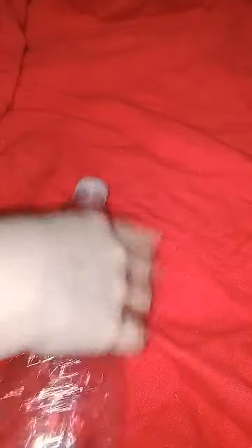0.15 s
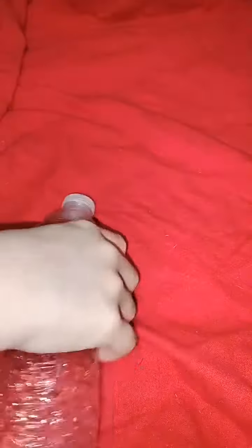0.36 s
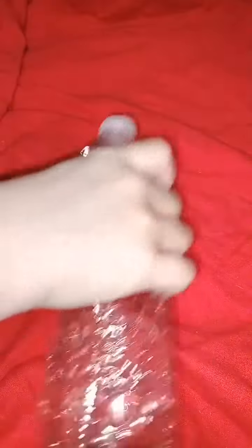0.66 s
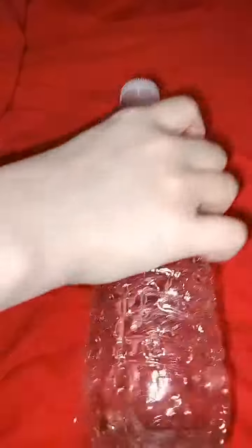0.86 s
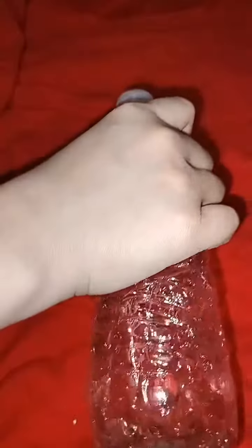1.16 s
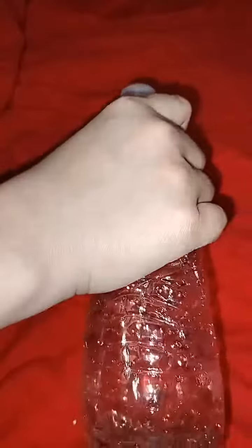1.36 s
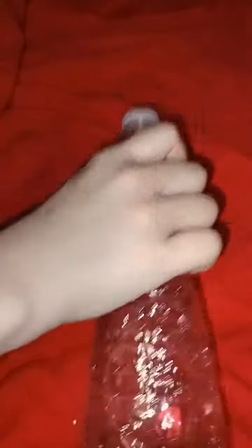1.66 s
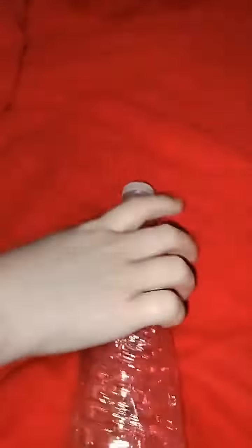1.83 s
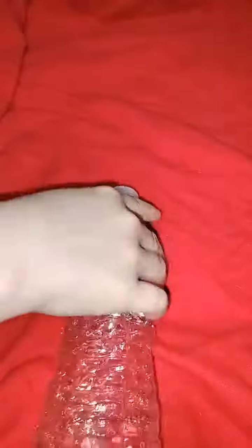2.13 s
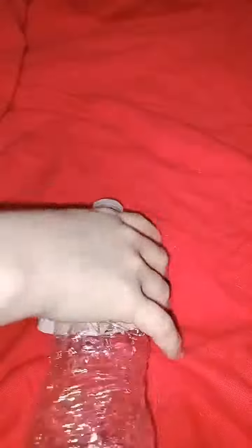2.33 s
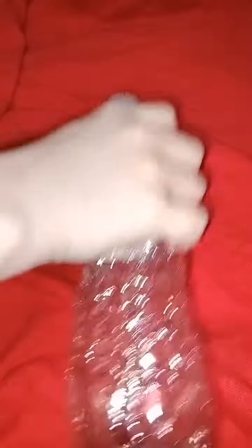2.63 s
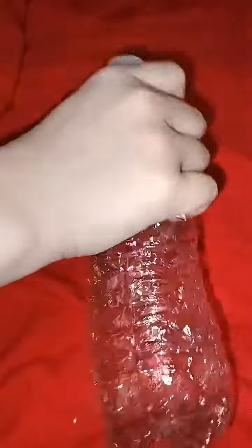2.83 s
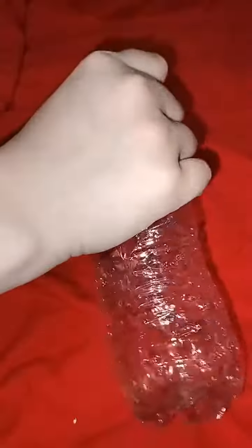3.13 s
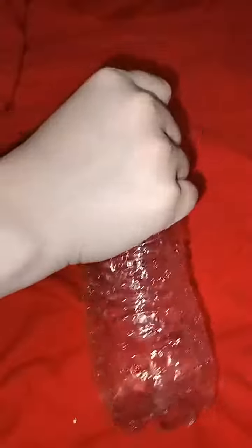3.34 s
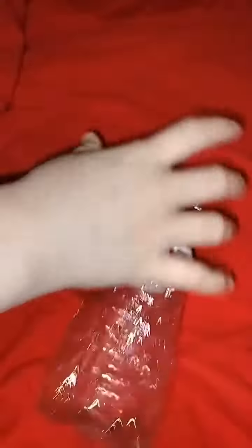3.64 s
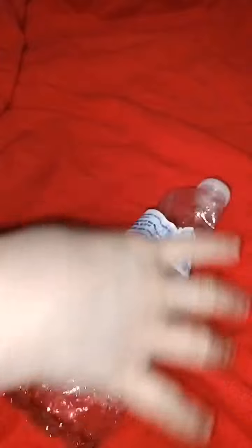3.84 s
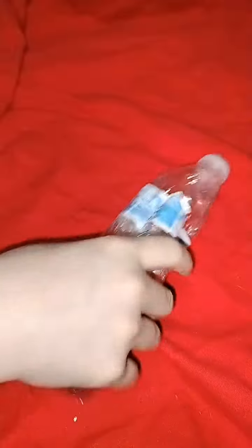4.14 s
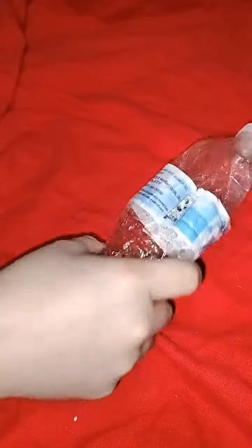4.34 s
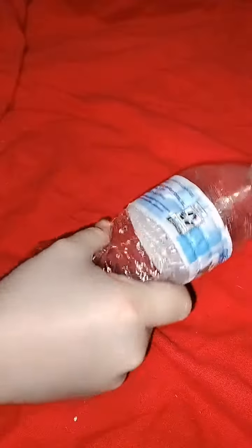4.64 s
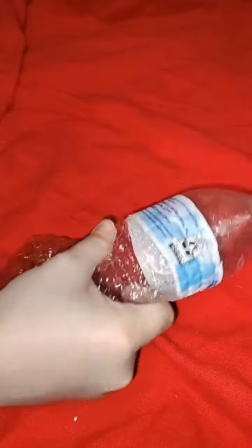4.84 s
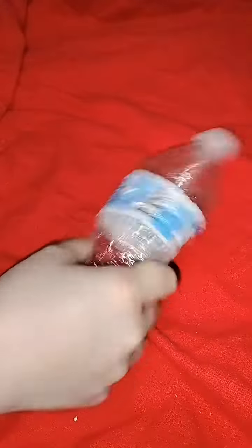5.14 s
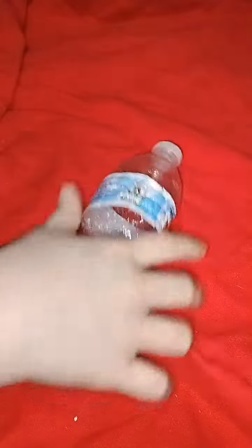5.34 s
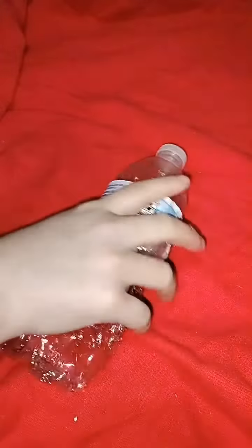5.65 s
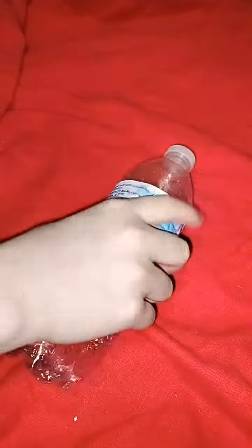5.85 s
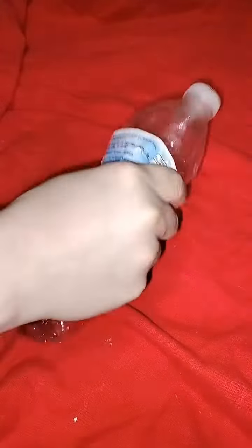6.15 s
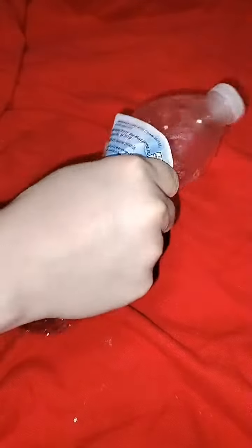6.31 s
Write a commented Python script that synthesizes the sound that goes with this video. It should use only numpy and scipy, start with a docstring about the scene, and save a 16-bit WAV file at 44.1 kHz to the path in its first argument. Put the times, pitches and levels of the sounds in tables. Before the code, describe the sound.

Crisp plastic bottle crushing: four crackling squeezes with bright snaps and dull dents, lighter clicks in the gaps, in a small quiet room.

```python
"""A hand crushes a thin plastic bottle on a cloth, close to a phone, in four squeezes with light touches between.
Each time the wall buckles, a panel pops over, its crease cracks and the film sizzles: damped tones and noise bursts.
Showers of tiny noise bursts are the small folds that follow the pressure; broad dents swing low and dull.
The hand bumps the bottle into the cloth with low pushes, and a small room answers with a tail of fading noise.
Steady noise lies underneath, and the loudest snaps overload the microphone."""
import sys
import numpy as np
from scipy import signal
from scipy.fft import rfft, irfft, next_fast_len
from scipy.io import wavfile
from scipy.ndimage import uniform_filter1d, map_coordinates

SR = 44100
rng = np.random.default_rng(int(sys.argv[2]) if len(sys.argv) > 2 else 0)


def file_out(sig):
    """Save sig as 16-bit WAV at sys.argv[1]."""
    # one column per channel
    cols = np.atleast_2d(sig).T
    # limit, then scale
    lim = np.clip(cols, -1, 1)
    pcm = np.round(lim * 32767).astype(np.int16)
    wavfile.write(sys.argv[1], SR, pcm)


N = 285757

# The quiet noise of the room. Each row: frequency in Hz, relative level in dB.
AIR_SPECTRUM = [(25, -18), (110, 2), (230, -15.5), (540, -1), (850, -9), (1600, -15.5), (7100, -20),
                (9500, -31.5), (16000, -25)]
# How alike left and right are. Each row: frequency in Hz, likeness from 0 (unrelated) to 1 (the same).
LEFT_RIGHT_LIKENESS = [(100, 0.73), (500, 0.84), (1000, 0.71), (2000, 0.049), (5000, 0.036), (14000, 0.042)]
# How long the room rings. Each row: frequency in Hz, time to fade by 60 dB in seconds.
ROOM_FADE_TIMES = [(200, 0.0362), (4000, 0.2), (14000, 0.22)]
# How strongly the room answers. Each row: frequency in Hz, level in dB.
ROOM_SPECTRUM = [(100, -15), (500, -1.5), (1500, -8), (4000, -7.5), (8000, -8.5), (14000, -5.5)]
# Soft bumps of hand and bottle. Each row: start in seconds, level in dB before a common lift.
BUMPS = [(1.007, -25.5), (1.06, -32.5), (1.342, -26.5), (1.385, -25), (3.003, -28.5), (3.181, -15),
         (4.444, -31.5), (4.574, -17), (4.627, -18), (4.917, -33.5), (6.352, -28)]
# Deep dents, where a broad piece of wall caves in. Each row: start in seconds, pitch in Hz, level in dB.
DENTS = [(0.423, 192, -27), (0.8167, 226, -9.5), (1.203, 206, -21), (1.642, 210, -19.5), (2.101, 410, -24),
         (2.859, 194, -16), (3.636, 400, -10.5), (4.272, 228, -18), (6.291, 200, -17)]
# The fingers shift or rest lightly on the bottle.
# Each row: start in seconds, end in seconds, rub or flutter level in dB, crinkle level in dB.
TOUCHES = [(0, 0.01, -45, -37), (0.257, 0.678, -42, -45.5), (1.597, 1.9, -47, -42.5),
           (2.12, 2.45, -50, -61), (3.372, 3.5, -68, -40.5), (3.574, 3.62, -32.5, -36.5),
           (3.995, 4.03, -53, -69), (4.137, 4.2, -69, -42.5), (4.894, 4.928, -35.5, -24),
           (5.0, 5.28, -43, -46.5)]
# The hand bears down. Each row: start in seconds, end in seconds, then panel flutter level in dB
# and crinkle level in dB, both before the build-up, drift and release set below.
SQUEEZES = [(0.779, 1.363, -25, -28.5), (2.716, 3.169, -24.5, -31.5), (4.245, 4.73, -15.5, -24),
            (5.93, 6.47, -23.5, -30.5)]
# Colour of the popping panels. Each row: frequency in Hz, relative level in dB.
PANEL_SPECTRUM = [(60, -21), (130, -8.5), (200, -3.5), (430, 0.5), (680, -0.5), (1000, -2), (1500, -6),
                  (2200, -7), (5000, -50.5)]
# Colour of the cracking creases. Each row: frequency in Hz, relative level in dB.
CREASE_SPECTRUM = [(500, -9), (1100, -6.5), (1600, 1), (3000, 0.5), (5000, -1.5), (7300, -3), (8500, -16),
                   (12000, -37.5)]
# Colour of the sizzling film. Each row: frequency in Hz, relative level in dB.
SIZZLE_SPECTRUM = [(4000, -29), (7000, 6.5), (8200, 0), (9500, -8), (11300, -1.5), (13500, -5.5),
                   (15500, -9), (17000, -6)]
# Colour laid over the fine crinkling creases. Each row: frequency in Hz, relative level in dB.
CRINKLE_SPECTRUM = [(600, -14), (1500, 0.5), (2300, 3), (3000, 1.5), (4200, 1.5), (7200, 0.5), (8800, -16),
                    (11300, -8), (15500, -5.5)]
# The loud or lone buckles of the wall. Each row: time in seconds, panel pitch in Hz, panel level in dB,
# crease pitch in Hz, crease level in dB, sizzle level in dB (the last two before a left-right tilt).
SNAPS = [ (0.1076, 1320, -29, 1600, -56, -61), (0.177, 594, -25.5, 3170, -13.5, -34),
         (0.4237, 530, -15.5, 2000, -19.5, -37), (0.4774, 960, -18.5, 7440, -12, -19.5),
         (0.4916, 1510, -17.5, 5970, -15.5, -38), (0.5957, 653, -19, 2500, -13.5, -19),
         (0.6276, 540, -25, 3900, -15.5, -33.5), (0.6624, 970, -24, 7060, -15.5, -24),
         (0.6771, 790, -21, 6600, -23.5, -24), (0.7492, 626, -20, 5120, -14.5, -29.5),
         (0.7578, 900, -18, 2950, -13, -21), (0.7755, 920, -34, 2320, -12.5, -33.5),
         (0.782, 750, -11, 2170, -27, -44), (0.8187, 363, -11.5, 2410, -12.5, -26),
         (0.8359, 1500, -15, 2350, -16, -24), (0.8926, 1310, -19, 2020, -9.5, -20),
         (0.9167, 500, -25, 2180, -19, -27), (0.9664, 572, -21.5, 2140, -11, -23.5),
         (1.0042, 945, -16, 7030, -10, -18.5), (1.0326, 537, -13, 2420, -15.5, -32.5),
         (1.0615, 566, -24, 7450, -13.5, -30), (1.1105, 1004, -15, 3620, -23.5, -25),
         (1.1547, 830, -15, 3160, -13.5, -23), (1.179, 744, -11, 7190, -13, -16),
         (1.2044, 850, -14, 3780, -32, -40), (1.2113, 870, -26, 3430, -13, -25.5),
         (1.272, 1110, -36, 5760, -13, -18), (1.3109, 1280, -20, 5060, -13.5, -19),
         (1.3503, 360, -28.5, 6400, -11.5, -17), (1.3868, 1240, -26, 7220, -14, -18),
         (1.433, 930, -45, 7100, -17.5, -15.5), (1.553, 1000, -38, 7000, -20, -24),
         (1.5737, 1200, -65, 6600, -15.5, -16.5), (1.643, 376, -19.5, 3640, -14, -31),
         (1.6846, 894, -25.5, 2980, -14.5, -18), (1.7156, 1170, -53, 6660, -18.5, -19.5),
         (1.7965, 824, -24, 3370, -17, -35), (1.8403, 1030, -18.5, 1460, -21, -21),
         (1.8909, 830, -12, 2470, -16.5, -27), (1.9136, 920, -14, 2130, -18.5, -49),
         (1.9595, 657, -26, 6800, -20, -21.5), (2.1125, 440, -29, 1600, -41.5, -54),
         (2.1753, 920, -29, 3650, -14, -20.5), (2.6026, 870, -23.5, 2520, -12, -27.5),
         (2.6698, 874, -15, 6640, -15, -22.5), (2.7304, 896, -17.5, 3660, -19, -23),
         (2.7495, 517, -14.5, 3210, -16, -17.5), (2.7618, 493, -17, 6300, -14.5, -18.5),
         (2.8174, 443, -28, 2250, -22, -24), (2.8395, 645, -14, 2020, -12.5, -17.5),
         (2.9023, 600, -12, 3080, -18, -48), (2.9158, 537, -9.5, 7500, -27, -26.5),
         (2.9392, 600, -11, 3270, -18, -55), (2.9562, 485, -13.5, 2190, -25, -46),
         (3.0066, 910, -24, 4100, -21, -18.5), (3.0195, 900, -15.5, 2190, -11.5, -27),
         (3.0313, 573, -14, 2250, -20.5, -39), (3.0507, 745, -18, 2330, -16.5, -31),
         (3.1128, 428, -23, 6900, -18, -17), (3.1246, 870, -20.5, 5000, -14, -24),
         (3.1565, 1400, -46, 3500, -14.5, -43), (3.1814, 530, -22, 4600, -15, -20),
         (3.2133, 910, -26.5, 5100, -15, -18), (3.2534, 1400, -31, 3580, -14, -19),
         (3.2918, 810, -33, 7000, -17, -29), (3.3272, 990, -36, 6540, -24, -25),
         (3.3603, 1000, -30.5, 4350, -8.5, -20.5), (3.407, 1210, -40, 4270, -17.5, -24.5),
         (3.524, 930, -31, 4030, -19, -33), (3.5932, 820, -24, 7340, -22.5, -36),
         (3.6382, 420, -31.5, 5600, -21.5, -18.5), (3.7676, 1060, -23, 6600, -18, -25.5),
         (4.1007, 620, -27.5, 6000, -12.5, -34), (4.1178, 930, -23.5, 3220, -13.5, -23.5),
         (4.2114, 613, -16.5, 1630, -34, -28.5), (4.2389, 467, -13.5, 1480, -11, -25),
         (4.2734, 644, -7, 1560, -18, -26), (4.299, 1080, -24.5, 3640, -14.5, -27),
         (4.3499, 405, -14.5, 1600, -43, -27), (4.4067, 980, -42, 4260, -19.5, -27),
         (4.455, 870, -17, 1780, -20, -17.5), (4.4642, 800, -20, 7100, -16, -17),
         (4.608, 930, -10, 1630, -13, -23), (4.7431, 790, -14.5, 2730, -27, -28),
         (4.7744, 1190, -19, 1970, -14.5, -21), (4.8372, 985, -30, 7200, -15.5, -22),
         (4.8828, 1140, -20.5, 3900, -15.5, -20), (4.922, 1120, -20.5, 2660, -15.5, -19),
         (4.979, 1000, -20.5, 3480, -18, -24.5), (5.0596, 300, -26.5, 1590, -47, -41.5),
         (5.0864, 684, -34, 3630, -34.5, -34.5), (5.1171, 980, -30.5, 2400, -33, -43),
         (5.1425, 950, -37.5, 2320, -27, -41), (5.159, 1160, -41, 7000, -38, -30),
         (5.2263, 580, -21.5, 2320, -25.5, -47), (5.2532, 1290, -28.5, 7460, -15.5, -18),
         (5.2575, 1330, -20, 2450, -20.5, -20), (5.2747, 1010, -16, 2030, -13.5, -29.5),
         (5.3014, 503, -20.5, 1590, -28, -45), (5.375, 1400, -16, 1790, -19, -43),
         (5.515, 553, -18.5, 1490, -16, -31.5), (5.6306, 580, -32, 5150, -42, -49),
         (5.6567, 604, -13, 1620, -46.5, -50), (5.7306, 900, -25, 1620, -40.5, -65),
         (5.81, 1230, -44, 1560, -40, -74), (5.8951, 715, -27, 3260, -25.5, -36),
         (5.913, 1030, -18, 3400, -17, -20.5), (5.922, 1040, -16.5, 3250, -13, -25),
         (5.9657, 990, -13.5, 7000, -19.5, -18), (5.9779, 654, -10.5, 2020, -12, -38),
         (6.0138, 670, -13.5, 1930, -14, -29), (6.0217, 910, -9, 1640, -19.5, -35),
         (6.0418, 580, -13, 1560, -40, -46), (6.0749, 635, -14, 6440, -22, -40),
         (6.0949, 1230, -17, 5070, -14.5, -18), (6.1237, 687, -25, 3800, -19.5, -27),
         (6.1807, 1170, -16, 7100, -10.5, -20), (6.2355, 382, -12.5, 3920, -19, -40.5),
         (6.2724, 1380, -13.5, 1640, -24, -42), (6.2898, 676, -9, 3630, -8, -15.5),
         (6.328, 930, -13.5, 3500, -14.5, -21), (6.368, 1210, -17, 5030, -13, -21),
         (6.3782, 725, -18.5, 3710, -9.5, -16), (6.3974, 910, -17.5, 6900, -11.5, -22),
         (6.4508, 1080, -13.5, 5840, -15.5, -32), (6.4717, 570, -11.5, 7120, -11, -25)]

TOP_HZ = 16250  # nothing is kept from here up
# pressure builds, holds and lets go; broad panels are used up as it goes on, while fine creases multiply
ATTACK_S, ATTACK_DB, RELEASE_DB_PER_S = 0.11, 13, 114
FLUTTER_SAG_DB_PER_S, CRINKLE_GROWTH_DB_PER_S = 11, 6
TOUCH_FADE_DB_PER_S = 278.5
# a small buckle: its middle pitches, its sizzle relative to its crease, and the loudest its crease can be
PANEL_HZ, CREASE_HZ = 816, 3930
SIZZLE_DB, SMALL_LIMIT_DB = -2.5, -16.5
# how far small buckles stand above flutter and crinkle, and how much their levels and pitches vary
SMALL_PANEL_DB, SMALL_CREASE_DB, SMALL_SCATTER_DB = 3, 4, 5
PANEL_SCATTER_OCTAVES, CREASE_SCATTER_OCTAVES = 0.4, 0.7


def amp(db):
    """Turn decibels into a gain."""
    return 10 ** (np.asarray(db) / 20)


def unit(x):
    """Scale to an average strength (rms) of 1."""
    return x / np.sqrt(np.mean(x ** 2) + 1e-20)


def along(points, hz):
    """Read a (Hz, value) table at any frequency, along a log frequency axis."""
    f, v = np.transpose(points)
    return np.interp(np.log(hz + 1), np.log(f + 1), v)


def colour(table):
    """Turn a (Hz, dB) table into a function that gives the gain at each frequency."""
    return lambda hz: amp(along(table, hz))


def hump(hz, centre, octaves, skirt_db):
    """Gain of a broad resonance that stands on a flat skirt."""
    distance = np.log2((hz + 1) / centre) / octaves
    return amp(skirt_db) + 1 / (1 + distance ** 2)


def shaped(x, gain):
    """Filter x by a gain for each frequency, without any sound ahead of its cause (minimum phase)."""
    size = 2 * next_fast_len(x.shape[-1])
    log_gain = np.log(np.maximum(gain(np.fft.rfftfreq(size, 1 / SR)), 1e-6))
    cepstrum = irfft(log_gain)
    # fold the second half onto the first, so that the filter only looks back
    cepstrum[..., 1:size // 2] *= 2
    cepstrum[..., size // 2 + 1:] = 0
    response = np.exp(rfft(cepstrum))
    return irfft(rfft(x, size) * response)[..., :x.shape[-1]]


def ports(pair):
    """Turn two unrelated signals into left and right: alike in the bass, apart in the treble."""
    size = next_fast_len(pair.shape[-1], True)
    likeness = along(LEFT_RIGHT_LIKENESS, np.fft.rfftfreq(size, 1 / SR))
    angle = np.arccos(np.clip(likeness, -1, 1)) / 2
    a, b = rfft(pair, size)
    mid, side = a * np.cos(angle), b * np.sin(angle)
    return irfft(np.array([mid + side, mid - side]), size)[..., :pair.shape[-1]]


def stereo_noise():
    """Steady noise for the whole scene, left and right."""
    return ports(rng.standard_normal((2, N)))


def ring(t, hz, cycles, lag, attack):
    """A damped tone that reaches left and right a little apart and dies over a set number of cycles."""
    delay = np.array([np.maximum(lag, 0), np.maximum(-lag, 0)])
    age = np.maximum(t - delay, 0)
    fade = np.exp(-age * hz / cycles) * (1 - np.exp(-age / attack))
    return np.sin(2 * np.pi * hz * age) * fade


def placed(times, sounds):
    """Add up (side, event, time) sounds at their moments."""
    start = np.round(times * SR).astype(int)
    index = np.maximum(start[:, None] + np.arange(sounds.shape[-1]), 0)
    return np.array([np.bincount(index.ravel(), side.ravel(), N)[:N] for side in sounds])


def air():
    """The quiet steady noise of the room: random noise given the room's colour."""
    return amp(-52.5) * unit(shaped(stereo_noise(), colour(AIR_SPECTRUM)))


def room(x):
    """The walls answer after a moment with fading noise and one stronger echo; treble outlasts bass."""
    hz, t, grains = signal.stft(rng.standard_normal((2, SR // 2)), SR, nperseg=256)
    fade = amp(-60 * t / along(ROOM_FADE_TIMES, hz)[:, None])
    tail = signal.istft(grains * fade, SR, nperseg=256)[1]
    age = np.arange(tail.shape[-1]) / SR
    echo = 0.53 * np.exp(-((age - 0.017) / 0.0022) ** 2)
    tail *= (1 - np.exp(-age / 0.00093)) * (1 + echo)
    tail = shaped(ports(tail / np.linalg.norm(tail[0])), colour(ROOM_SPECTRUM))
    return signal.fftconvolve(x, tail, axes=1)[:, :N]


def bumps():
    """A bump is one low push of air that sinks in pitch, dies fast and differs a little left and right."""
    s, db = np.transpose(BUMPS)
    t = np.arange(SR // 10) / SR
    sway = rng.standard_normal((len(BUMPS), 2, 1)).swapaxes(0, 1)
    hz = 62 * np.exp(0.54 * sway)
    push = -np.sin(2 * np.pi * hz * t / (1 + t / 0.18)) * np.exp(-t / 0.0065)
    return placed(s, amp(db + 10.5)[None, :, None] * push)


def dents():
    """A broad piece of wall swings briefly, low and dull, as a strongly damped tone."""
    s, hz, db = np.transpose(DENTS)[:, :, None]
    t = np.arange(SR // 20) / SR
    return placed(s.ravel(), amp(db) * ring(t, hz, cycles=1.2, lag=0 * s, attack=0.0011))


def touching(t):
    """Rub or flutter and crinkle gains of the light touches at times t: steady, fading in and out."""
    start, end, rub_db, crinkle_db = np.transpose(TOUCHES)[:, :, None]
    fade_db = TOUCH_FADE_DB_PER_S * np.abs(t - np.clip(t, start, end))
    return amp((rub_db - fade_db).max(0)), amp((crinkle_db - fade_db).max(0))


def squeezing(t):
    """Flutter and crinkle gains that the squeezes give at times t: pressure builds, holds and lets go."""
    start, end, flutter_db, crinkle_db = np.transpose(SQUEEZES)[:, :, None]
    held = np.clip(t - start, 0, end - start)
    build_db = -ATTACK_DB * np.maximum(1 - (t - start) / ATTACK_S, 0) ** 2
    pressure_db = build_db - RELEASE_DB_PER_S * np.maximum(t - end, 0)
    flutter = amp(flutter_db + pressure_db - FLUTTER_SAG_DB_PER_S * held).sum(0)
    crinkle = amp(crinkle_db + pressure_db + CRINKLE_GROWTH_DB_PER_S * held).sum(0)
    return flutter, crinkle


def ticks(rate, spread_db, life):
    """A stereo shower of tiny noise bursts of uneven size, rms 1; rate is per second, life in seconds."""
    struck = rng.random(N) < rate / SR
    size_db = spread_db * np.minimum(rng.exponential(size=N), 3)
    power = struck * amp(size_db) ** 2
    power = signal.lfilter([1], [1, -np.exp(-2 / (life * SR))], power)
    # the hand feeds in energy evenly, however it is shared among the folds
    power /= np.abs(uniform_filter1d(power, int(0.06 * SR))) + 0.033 * power.mean()
    return unit(np.sqrt(power) * stereo_noise())


def rubbing():
    """The faintest contact rubs in soft uneven strokes: dull noise whose strength wanders."""
    wander = map_coordinates(rng.standard_normal(N // 900 + 2), [np.arange(N) / 900])
    dull = shaped(stereo_noise(), lambda hz: 1 / (1 + (hz / 900) ** 2))
    return unit(amp(4 * wander) * dull)


def fine_creases(effort):
    """Fine creases crackle and sizzle as showers of ticks, denser and brighter with effort."""
    def shower():
        return ticks(rate=40 + 420 * effort ** 2, spread_db=5.5, life=0.0011)

    # long, middling and short creases crackle in three registers
    creases = 0
    for centre in (2050, 3700, 6800):
        creases = creases + shaped(shower(), lambda hz: hump(hz, centre, octaves=0.46, skirt_db=-14.0))
    creases = unit(shaped(creases, colour(CRINKLE_SPECTRUM)))
    sizzle = unit(shaped(shower(), colour(SIZZLE_SPECTRUM)))
    return creases + amp(-9.5) * effort * sizzle


def folds():
    """Small panels flutter and fine creases crinkle: the harder the hand presses, the denser and brighter."""
    t = np.arange(N) / SR
    flutter, crinkle = np.hypot(squeezing(t), touching(t))
    effort = np.sqrt(crinkle / crinkle.max())
    # only the faintest contact rubs smoothly; anything firmer makes the panels flap
    grip = 1 / (1 + (amp(-56) / flutter) ** 2)
    rub = rubbing()
    flaps = ticks(rate=120 + 400 * effort ** 2, spread_db=4.0, life=0.0016)
    flaps = np.sqrt(grip) * flaps + np.sqrt(1 - grip) * rub
    flaps = unit(shaped(flaps, colour(PANEL_SPECTRUM)))
    return flutter * flaps + crinkle * fine_creases(effort)


def small_buckles(count):
    """Rows like those of SNAPS, count to a squeeze, at uneven moments and as strong as the hand presses."""
    start, end = np.transpose(SQUEEZES)[:2, :, None]
    share = (np.arange(count) + rng.random((len(SQUEEZES), count))) / count
    s = (start + (end - start) * share).ravel()
    width, length, swing, force = rng.standard_normal((len(s), 4)).T
    flutter_db, crinkle_db = 20 * np.log10(squeezing(s))
    panel_hz = PANEL_HZ * 2 ** (PANEL_SCATTER_OCTAVES * width)
    panel_db = flutter_db + SMALL_PANEL_DB + SMALL_SCATTER_DB * swing
    crease_hz = CREASE_HZ * 2 ** np.clip(CREASE_SCATTER_OCTAVES * length, -1, 1)
    crease_db = crinkle_db + SMALL_CREASE_DB + SMALL_SCATTER_DB * force
    crease_db = np.minimum(crease_db, SMALL_LIMIT_DB)
    return np.transpose([s, panel_hz, panel_db, crease_hz, crease_db, crease_db + SIZZLE_DB])


def bursts(t, life, count):
    """One stereo burst of dying noise for each snap: (side, snap, time)."""
    noise = rng.standard_normal((count, 2, len(t))).swapaxes(0, 1)
    return ports(noise) * np.exp(-t / life)


def blow(x):
    """Give each snap the energy of 5 ms at rms 1."""
    energy = np.mean(np.sum(x ** 2, -1, keepdims=True), 0)
    return x / np.sqrt(energy / (0.005 * SR) + 1e-20)


def panel(t, hz0, hollow, lag, way):
    """A panel flaps over; if it pops without creasing, it starts softly and rings hollow."""
    noise = bursts(t, life=0.0035, count=len(hz0))
    flap = shaped(noise, lambda hz: colour(PANEL_SPECTRUM)(hz) * hump(hz, hz0, octaves=0.73, skirt_db=-7))
    pop = way * ring(t, hz0, cycles=0.77 + 0.37 * hollow, lag=lag, attack=0.0015 + 0.0025 * hollow)
    return blow((1 - 0.92 * hollow) * blow(flap) + 0.79 * blow(pop))


def crease(t, hz0, lag, way):
    """A crease cracks at its own pitch straight ahead; over all directions the pitch evens out."""
    tear = shaped(bursts(t, life=0.0014, count=len(hz0)), colour(CREASE_SPECTRUM))
    crack = blow(shaped(tear, lambda hz: hump(hz, hz0, octaves=0.35, skirt_db=-11)))
    ping = blow(way * ring(t, hz0, cycles=8.9, lag=lag, attack=0.0001))
    ahead = blow(crack + 0.45 * ping)
    around = blow(crack + blow(tear))
    return ahead, around


def film_sizzle(t, count):
    """The thin film sizzles at each snap: a very short burst of high noise."""
    return blow(shaped(bursts(t, life=0.0018, count=count), colour(SIZZLE_SPECTRUM)))


def snaps():
    """Panel, crease and film of every buckle: the sound at the phone, and the sound sent round the room."""
    rows = np.vstack([SNAPS, small_buckles(count=15)])
    s, panel_hz, panel_db, crease_hz, crease_db, sizzle_db = rows.T[:, :, None]
    t = np.arange(1024) / SR
    place, inward, turn, wait = rng.standard_normal((len(s), 4)).T[:, :, None]
    lag = 0.00011 * place  # seconds between left and right
    way = np.sign(inward)  # the wall moves in or out
    # near 1 where the panel pops with hardly any crease
    hollow = 1 / (1 + amp(crease_db - panel_db + 24.5) ** 2)
    body = amp(panel_db) * panel(t, panel_hz, hollow, lag, way)
    ahead, around = crease(t, crease_hz, lag, way)
    sizzle = amp(sizzle_db) * film_sizzle(t, len(s))
    # each crease faces one port more than the other; the left port is the brighter one
    left = np.array([1, -1])[:, None, None]
    treble = amp(left * turn) * (amp(crease_db) * ahead + amp(left * 2.7) * sizzle)
    # the film starts to give a moment before it snaps through
    early = s - 0.0016 * np.exp(0.5 * wait)
    lead_in = placed(early.ravel(), amp(crease_db - 17) * around)
    direct = placed(s.ravel(), body + treble) + lead_in
    spread = placed(s.ravel(), body + amp(crease_db) * around + sizzle)
    return direct, spread


def scene():
    """The bottle, its room and the background added together."""
    direct, spread = snaps()
    wall = folds() + dents()
    return direct + wall + room(spread + wall) + bumps() + air()


def record(dry):
    """The phone rounds off the highest peaks and keeps nothing above its band limit."""
    clipped = dry / (1 + np.abs(dry) ** 5) ** (1 / 5)
    size = next_fast_len(N + 8192)
    kept = np.fft.rfftfreq(size, 1 / SR) < TOP_HZ
    return irfft(rfft(clipped, size) * kept, size)[:, :N]


dry = scene()
out = record(dry)
file_out(out)
```